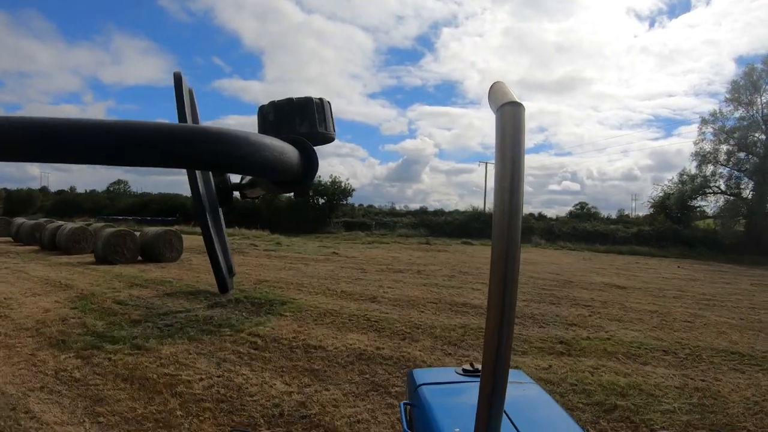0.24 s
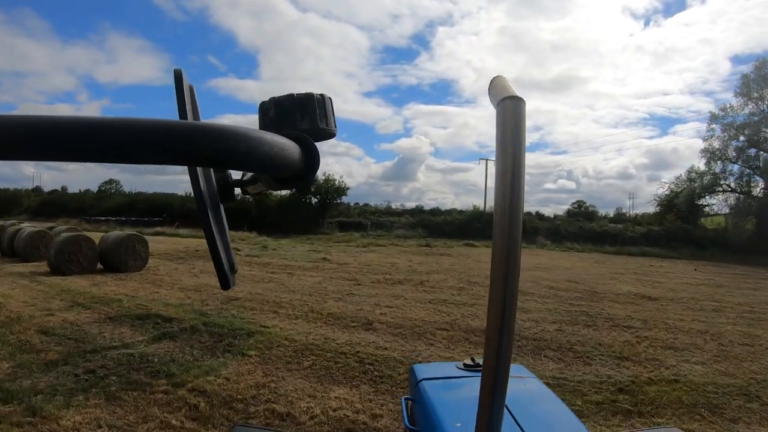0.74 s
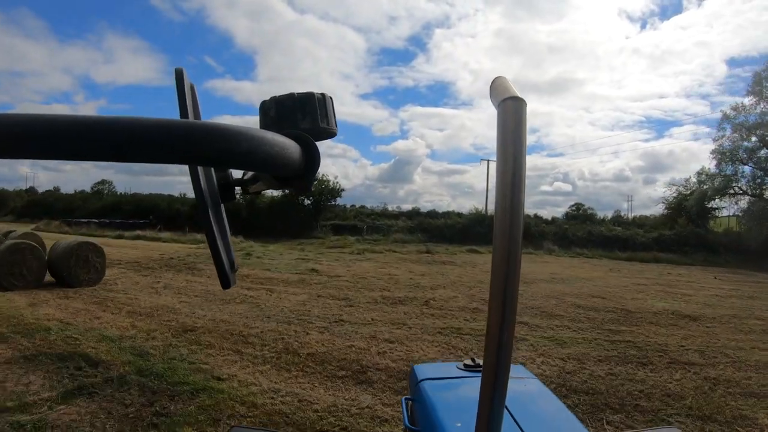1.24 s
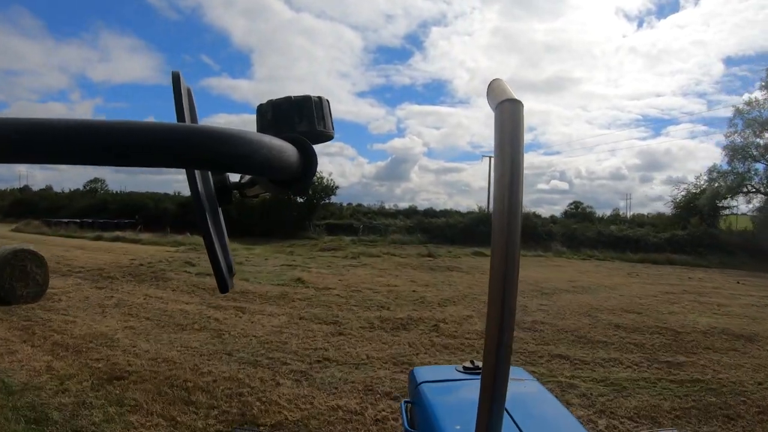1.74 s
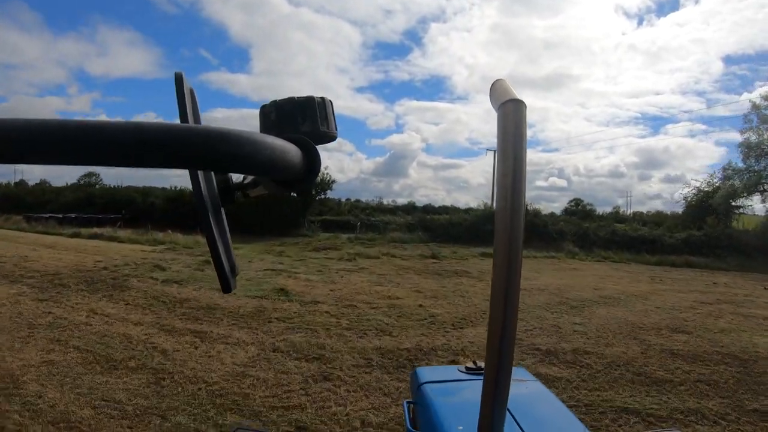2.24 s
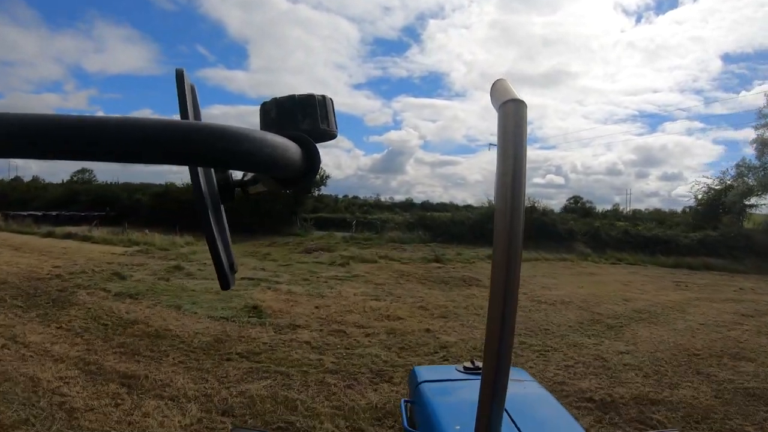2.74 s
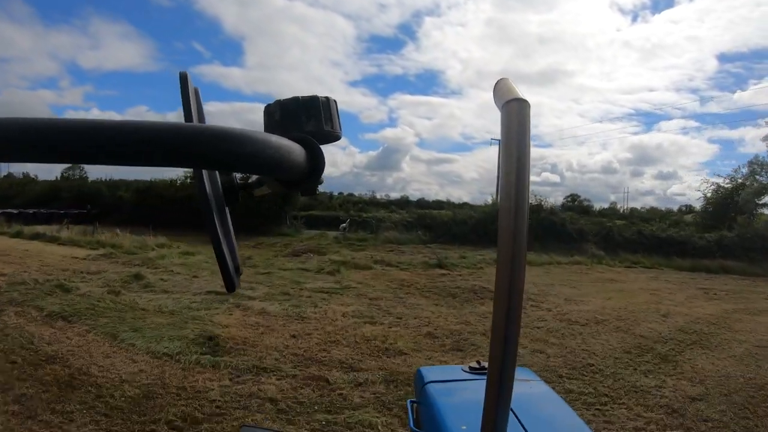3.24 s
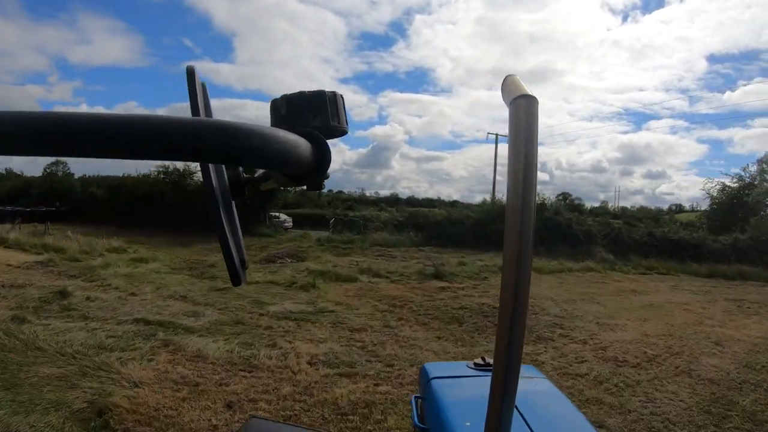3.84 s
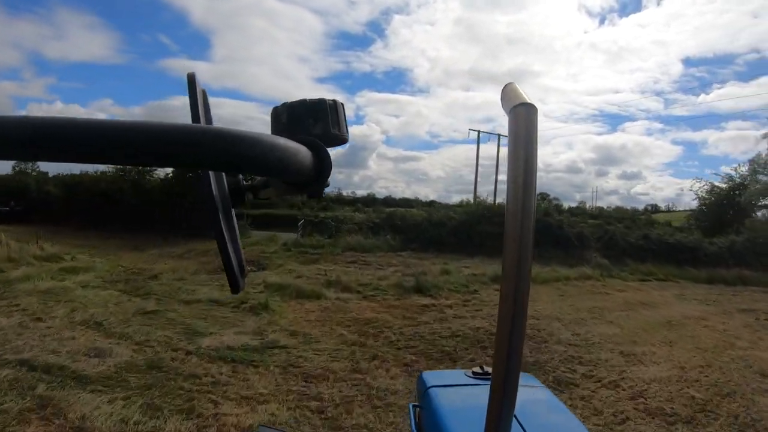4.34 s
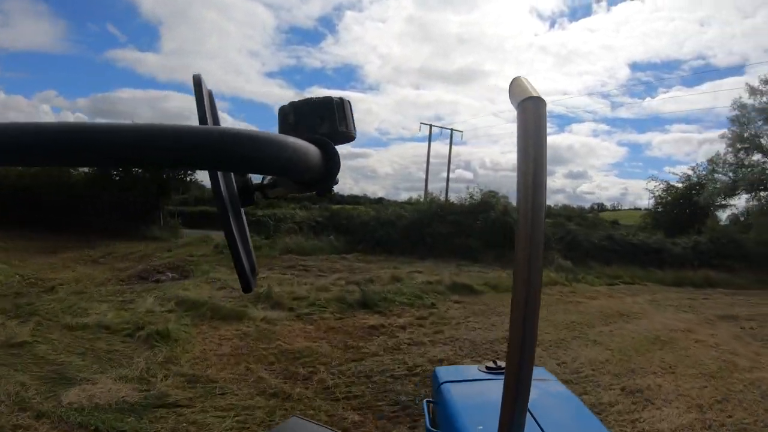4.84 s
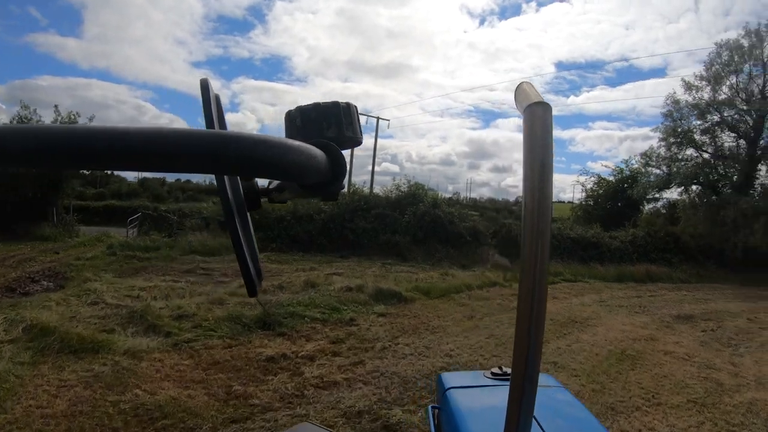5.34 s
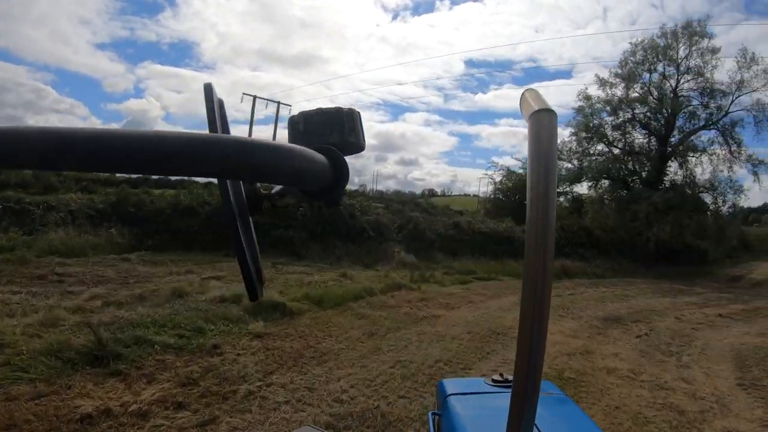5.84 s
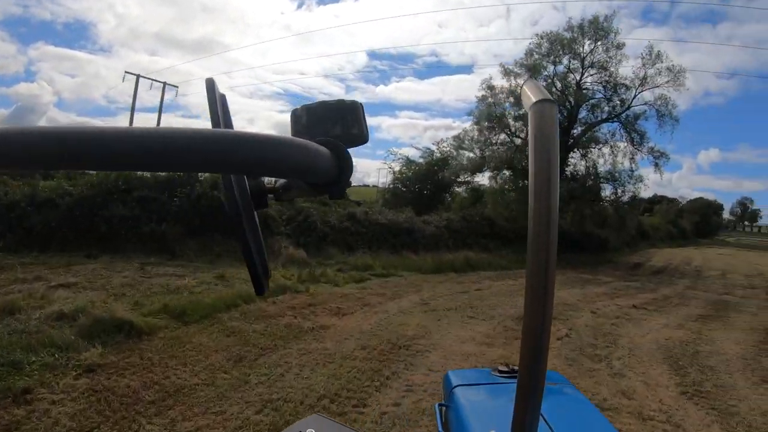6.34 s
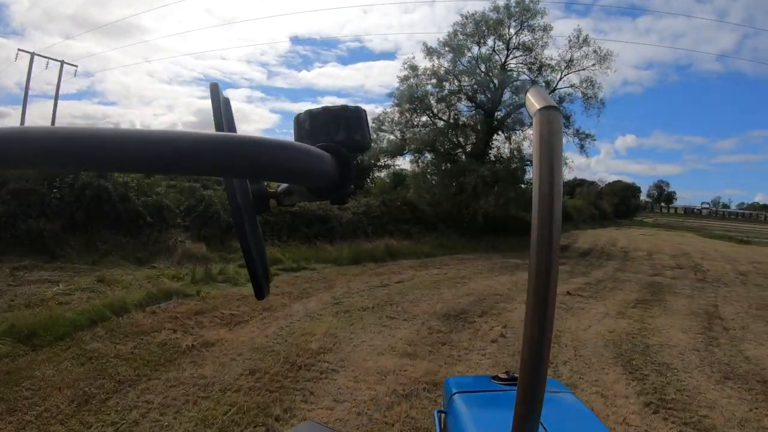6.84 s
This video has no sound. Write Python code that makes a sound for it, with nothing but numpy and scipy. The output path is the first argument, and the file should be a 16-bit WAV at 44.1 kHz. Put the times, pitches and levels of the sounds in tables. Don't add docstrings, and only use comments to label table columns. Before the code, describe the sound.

A tractor's diesel engine drones loudly and continuously, heard from a camera mounted on the cab in an open field. At first the sound is bright and wide, with pulsing exhaust hiss on the right and small taps on the left between 0.15 and 0.8 s; from about 0.7 to 1.3 s it closes into a duller, centred tone. A strong low hum near 100 Hz and its octave carry clatter, panel knocks, cab boom and tyre rumble that eases early on. Pitch sags slightly until 4.2 s, then more clearly to 5.5 s. Around 5.6 s the throttle closes: the hum stumbles, weakens and falls to roughly half its pitch by 6.8 s, leaving clatter exposed. Soft mount knocks are scattered throughout; low wind gusts thump near 4, 5.9 and 6.9 s. Faint hissy squeaks appear around 6.5 and 7 s, as a final throttle blip lifts the growl before it ends.

```python
import sys
import numpy as np
from scipy import signal
from scipy.fft import rfft, irfft
from scipy.io import wavfile

SR = 44100
rng = np.random.default_rng(int(sys.argv[2]) if len(sys.argv) > 2 else 0)


def level_to_linear(level):
    exponent = np.asarray(level, float) / 20
    return 10 ** exponent


def file_out(sig):
    cols = np.atleast_2d(sig).T
    lim = np.clip(cols, -1, 1)
    pcm = np.round(lim * 32767).astype(np.int16)
    wavfile.write(sys.argv[1], SR, pcm)


N = 312360
TIME_S = np.arange(N) / SR
FFT_HZ = np.fft.rfftfreq(N, 1 / SR)
SWITCH_S = 0.72


def rms_one(x):
    return x / np.sqrt(np.mean(x ** 2) + 1e-20)


def in_time(rows):
    s, *columns = np.transpose(rows)
    return [np.interp(TIME_S, s, c) for c in columns]


def at_hz(points, column=1):
    points = np.array(points)
    return np.interp(np.log(FFT_HZ + 1), np.log(points[:, 0]), points[:, column])


def shaped(x, response):
    return irfft(rfft(x) * response, N)


def band_noise(low_hz, high_hz):
    band = signal.butter(2, [low_hz, high_hz], "band", fs=SR, output="sos")
    return rms_one(signal.sosfilt(band, rng.standard_normal(N)))


def drift(rate_hz):
    r = np.exp(-80 * np.pi * rate_hz / SR)
    slow = signal.lfilter([1], [1, -2 * r, r * r], rng.standard_normal(N // 40 + 2002))[2000:]
    return np.interp(np.arange(N) / 40, np.arange(len(slow)), rms_one(slow))


def swells(events, column=2):
    return sum(row[column] * np.exp(-((TIME_S - row[0]) / row[1]) ** 2) for row in events)


def ramp(start_s, length_s):
    return np.clip(1 - (TIME_S - start_s) / length_s, 0, 1)


def strike(at, peaks_db, modes, spread_db):
    out = np.zeros(N)
    for hz, level_db, t60_s in modes:
        clicks = np.full(N, 1e-18)
        clicks[at] = level_to_linear(peaks_db + level_db + spread_db * rng.standard_normal(len(at)))
        r, w = level_to_linear(-60 / (t60_s * SR)), 2 * np.pi * hz / SR
        out += signal.lfilter([0, np.sin(w)], [1, -2 * r * np.cos(w), r * r], clicks)
    return out


# (time [s], fuel against full [dB], strain against cruise [dB])
THROTTLE = [(0, -6, 0), (.06, -4.5, -2), (1.06, -0.5, 1.5), (1.5, 1, 1), (1.9, 0, -1.5), (2.6, 1, .5),
            (4.3, -0.5, -0.5), (5.0, 0, 3), (5.52, 1.5, 1.5), (5.66, -15.5, -3), (6.15, -13, -1.5),
            (6.35, -19.5, -2.5), (6.81, -15.5, -4.5), (6.86, -5, 6.5), (6.93, -0.5, 9), (7.0, 2, 5),
            (7.04, -7.5, 0), (7.08, -7, 3.5)]
# (time [s], length [s], first order [dB], second order [dB])
MISFIRES = [
    (4.55, 0.04, 1, -3.5),
    (4.78, 0.029, 0.5, -4),
    (5.56, 0.029, -2, -8),
    (5.6, 0.027, 11, 1),
    (5.7, 0.044, 4.5, -2),
    (5.87, .06, 6.5, -3.5),
]


def levels(rate_hz):
    fuel_db, strain_db = in_time(THROTTLE)
    lost_db = np.minimum(fuel_db, 0)
    cab_hz, cab_width_hz = 97.5, 2.45
    cab = np.exp(-((rate_hz - cab_hz) / cab_width_hz) ** 2)
    slower_hz = cab_hz - rate_hz
    far = ramp(SWITCH_S, 0.3)
    smooth = ramp(0.44, 1.34)
    first_flutter_db = 0.2 * lost_db * drift(9.7)
    second_loss_db = (0.55 + 0.2 * drift(14)) * lost_db
    off_pipe_db = 0.04 * np.abs(195.2 - 2 * rate_hz)
    return dict(
        first=-15.5 + fuel_db + first_flutter_db + swells(MISFIRES, column=2),
        second=-14 + second_loss_db - off_pipe_db + swells(MISFIRES, column=3),
        clatter=-29.5 + strain_db,
        treble=-43.5 + 0.92 * strain_db - 1.5 * far - 0.15 * lost_db,
        knock=-28.5 + 0.55 * lost_db - 8.5 * cab - 0.12 * slower_hz,
        cab_tone=-30 + 7 * cab,
        boom=-31 + 0.9 * np.maximum(strain_db, 0) + 5 * cab - 3.5 * far - 0.22 * lost_db,
        rumble=-26.5 + 0.05 * strain_db - 0.06 * slower_hz - 12.5 * smooth)


# (multiple of firing rate [-], level against second order [dB])
WEAK_ORDERS = [(4 / 3, -22.5), (7 / 3, -14.5)]
# (multiple of firing rate [-], level against cab tone [dB])
CAB_ORDERS = [(3, -7), (10 / 3, -7), (9 / 2, -9.5), (14 / 3, -15)]


def exhaust(turn, first_db, second_db, cab_tone_db):
    second_lag_rad = 1.8
    out = level_to_linear(first_db + 0.28 * drift(32)) * np.cos(turn + 0.043 * drift(22))
    second_phase = 2 * turn - second_lag_rad + 0.02 * drift(11)
    out += level_to_linear(second_db + 0.17 * drift(34)) * np.cos(second_phase)
    for multiple, level_db in WEAK_ORDERS:
        gain = level_to_linear(second_db + level_db + 2 * drift(0.76))
        out += gain * np.cos(multiple * turn + 0.5 * drift(0.63))
    fuelled_db = np.minimum(second_db + 14.5, 0)
    for multiple, level_db in CAB_ORDERS:
        gain = level_to_linear(cab_tone_db + fuelled_db + level_db + drift(4.9))
        out += gain * np.cos(multiple * turn + 0.37 * drift(5))
    return np.sqrt(2) * out


# (frequency [Hz], density [dB per Hz])
CLATTER = [(100, -72), (250, -18.5), (480, -9.5), (720, 0.6), (1400, -8.5), (2000, -9), (2700, -17),
           (3400, -20.5), (4900, -27.5), (5400, -36), (7300, -42.5), (7800, -53.5), (10300, -59.5),
           (11300, -105)]
# (frequency [Hz], width [Hz], level [dB])
BLOCK = [(450, 180, 6.5), (675, 200, -3), (1692, 110, 5), (2060, 230, 0.5), (2540, 230, 4.5),
         (2920, 91, -5.5), (3660, 590, 3.5), (3960, 220, -10), (4386, 770, 6)]


def clatter(turn, clatter_db, treble_db):
    block_db = sum(db / (1 + (2 * (FFT_HZ - f) / width) ** 2) for f, width, db in BLOCK)
    colour = level_to_linear(at_hz(CLATTER) + block_db)
    upper = 1 / (1 + (2900 / (FFT_HZ + 1)) ** 8)
    swell_db = 0.68 * np.cos(turn) + 0.29 * np.cos(turn / 3) + 0.64 * drift(25)
    puffs = rng.standard_normal((2, N)) * level_to_linear(swell_db)
    low = shaped(puffs[0] * level_to_linear(0.68 * drift(20)), colour * (1 - upper))
    high = shaped(puffs[1] * level_to_linear(0.59 * np.cos(turn) + 0.92 * drift(30)), colour * upper)
    return level_to_linear(clatter_db + 1.5) * rms_one(low) + level_to_linear(treble_db - 1.16) * rms_one(high)


# (frequency [Hz], width [Hz], level against clatter [dB])
SINGING = [(704, 9, -12), (1085, 12, -14), (1174, 9, -11), (1787, 12, -14), (2004, 20, -18), (2412, 9, -22),
           (2530, 9, -21), (2707, 20, -25)]


def singing_parts(clatter_db):
    out = np.zeros(N)
    for hz, width_hz, db in SINGING:
        r, w = np.exp(-np.pi * width_hz / SR), 2 * np.pi * hz / SR
        ring = signal.lfilter([1, 0, -1], [1, -2 * r * np.cos(w), r * r], rng.standard_normal(N))
        out += level_to_linear(clatter_db + db + 2.3 * drift(1.0)) * rms_one(ring)
    return signal.sosfilt(signal.butter(6, 4000, fs=SR, output="sos"), out)


# (frequency [Hz], density [dB per Hz])
RUMBLE = [(20, -39), (40, -11.5), (60, -1), (100, 2), (150, 2), (215, 1.5), (250, -10.5), (330, -18.5),
          (500, -62.5), (2000, -120)]
# (frequency [Hz], density [dB per Hz])
BOOM = [(30, -90), (120, -22), (220, 0), (270, 3.5), (350, 2), (450, 0.5), (600, -10), (900, -47),
        (3000, -120)]


def chassis(rumble_db, boom_db):
    shakes = rng.standard_normal((2, N)) * level_to_linear(0.8 * drift(14))
    rumble = level_to_linear(rumble_db + 5.5) * rms_one(shaped(shakes[0], level_to_linear(at_hz(RUMBLE))))
    return rumble + level_to_linear(boom_db + 0.5) * rms_one(shaped(shakes[1], level_to_linear(at_hz(BOOM))))


# (frequency [Hz], density [dB per Hz])
WIND = [(5, -26.5), (15, 0), (30, 17), (50, 9.5), (75, 9), (150, -45), (1000, -120)]
# (time [s], length [s], rise [dB])
GUSTS = [
    (3.45, .15, 4),
    (3.95, 0.14, 8),
    (4.6, .15, 2.5),
    (5.21, .1, 3),
    (5.86, 0.13, 10.5),
    (6.92, .25, 9.5),
]


def wind():
    lumps = rng.standard_normal(N) * level_to_linear(1.5 * drift(6))
    breeze_db = -48.5 + 2.14 * TIME_S
    return level_to_linear(breeze_db + swells(GUSTS)) * rms_one(shaped(lumps, level_to_linear(at_hz(WIND))))


# (frequency [Hz], density [dB per Hz])
JET = [(1500, -65), (3000, -3), (4200, -4), (5500, -2), (7000, -5.5), (8600, -5.5), (10800, -13),
       (12000, -20.5), (13700, -24.5), (14200, -58.5)]


def jet(turn):
    puffs = rng.standard_normal(N) * level_to_linear(1.5 * np.cos(turn) + 0.7 * drift(40))
    return level_to_linear(-32.5) * rms_one(shaped(puffs, level_to_linear(at_hz(JET))))


CYLINDER_DB = [-14, -13, 0, -15, -16, -4]
# (frequency [Hz], level [dB], t60 [s])
PANELS = [(704, 0, .07), (748, 0, .05), (1174, -5, .07), (1085, -8, .06)]


def knock(turn, knock_db):
    firing = (turn / (2 * np.pi)).astype(int)
    at = np.flatnonzero(np.diff(firing))
    raps = strike(at, np.array(CYLINDER_DB)[firing[at] % 6], PANELS, spread_db=2.5)
    out = np.zeros(N)
    for edges_hz in ([630, 830], [1000, 1260]):
        out += signal.sosfilt(signal.butter(2, edges_hz, "band", fs=SR, output="sos"), raps)
    return level_to_linear(knock_db - 0.5) * rms_one(out)


# (time [s], peak [dB])
TAPS = [
    (.1456, -11),
    (.4570, -10),
    (.464, -13),
    (.559, -16),
    (.652, -10),
    (.666, -14),
    (.8, -16),
]
# (time [s], peak [dB])
JOLTS = [(1.5768, -12), (2.4242, -15), (2.5755, -13.5), (3.7334, -16), (4.0585, -19), (4.1605, -15.5),
         (4.4544, -32), (4.813, -15), (4.9443, -31), (5.904, -18), (6.8186, -18), (7.0604, -23)]
# (frequency [Hz], level [dB], t60 [s])
MOUNT = [(904, -4, 0.014), (1380, -9, 0.024), (1533, -4, .03), (1923, -0.5, 0.015), (2480, -6.5, 0.028)]


def rattles(events, offset_db):
    s, db = np.transpose(events)
    knocks = strike((s * SR).astype(int), db + offset_db, MOUNT, spread_db=2)
    return signal.sosfilt(signal.butter(6, 2900, fs=SR, output="sos"), knocks)


# (frequency [Hz], left [dB], right [dB], likeness [0-1])
PORTS = [(102, 1, 3, 0.92), (192, 0.3, 2.5, 0.97), (360, -6.5, -1.2, 1), (503, -3.5, 1.5, 0.9),
         (726, -4, 7.5, 0.7), (990, -2, 8.5, 0.4), (1390, 3.5, 8.5, 0.6), (2020, -3.5, 6, 0),
         (2700, 4, 6.5, 0.5), (4070, 4.5, 7, 0.9), (5500, 7.5, 7.5, .6), (7300, 6.5, 12.5, .6),
         (8000, -12, 8, .6)]


def ports(tones, noise, other_noise, own):
    cavity_hz, fade_db_per_s = 720, -38
    alike = np.clip(at_hz(PORTS, column=3), 0, 1)
    lead_rad = 0.18 + np.pi * FFT_HZ ** 3 / (FFT_HZ ** 3 + cavity_hz ** 3)
    left = shaped(tones + noise, level_to_linear(at_hz(PORTS, column=1)))
    right_gain = level_to_linear(at_hz(PORTS, column=2)) * np.exp(1j * lead_rad)
    right = shaped(tones, right_gain) + shaped(noise, right_gain * alike)
    right += shaped(other_noise, right_gain * np.sqrt(1 - alike ** 2))
    opened = level_to_linear(fade_db_per_s * np.maximum(TIME_S - SWITCH_S, 0))
    return opened * (np.array([left, right]) + own) + (1 - opened) * (tones + noise)


def hiss(rate_hz):
    level_db = -68 + 4 * np.minimum(rate_hz - 78, 0) + 1.2 * drift(30)
    fizz = level_to_linear(level_db) * band_noise(11800, 14500) * (1 - ramp(SWITCH_S, 0.6))
    return fizz * level_to_linear([[-12], [0]])


# (time [s], length [s], level [dB])
SQUEAKS = [
    (6.43, .03, -77),
    (6.52, .06, -73),
    (7.02, .04, -74),
]


def squeaks():
    events = [(s, length_s, level_to_linear(db)) for s, length_s, db in SQUEAKS]
    return band_noise(8750, 9650) * swells(events)


# (time [s], firing rate [Hz])
SPEED = [(0, 99.38), (1.28, 97.67), (1.92, 96.11), (2.02, 94.86), (2.54, 94.2), (3.77, 93.83),
         (3.86, 94.27), (4.22, 91.47), (4.46, 85.99), (4.88, 86.13), (5.07, 84.18), (5.49, 81.57),
         (5.62, 76.8), (6.15, 56), (6.3, 51.5), (6.8, 46), (7.0, 56), (7.08, 57)]


def scene():
    rate_hz, = in_time(SPEED)
    turn = 2 * np.pi * (0.95 + np.cumsum(rate_hz) / SR)
    db = levels(rate_hz)
    tones = exhaust(turn, db["first"], db["second"], db["cab_tone"]) + knock(turn, db["knock"])
    tones = tones + singing_parts(db["clatter"]) + rattles(JOLTS, -4)
    noise = clatter(turn, db["clatter"], db["treble"]) + chassis(db["rumble"], db["boom"]) + wind()
    other_noise = clatter(turn, db["clatter"], db["treble"]) + chassis(db["rumble"], db["boom"])
    own = np.array([rattles(TAPS, -7), jet(turn)])
    return ports(tones, noise, other_noise, own) + hiss(rate_hz) + squeaks()


def low_pass(x):
    return signal.sosfilt(signal.butter(12, 15700, fs=SR, output="sos"), x)


def record(dry):
    mix = 1.2 * np.tanh(dry / 1.2)
    return low_pass(mix)


dry = scene()
out = record(dry)
file_out(out)
```